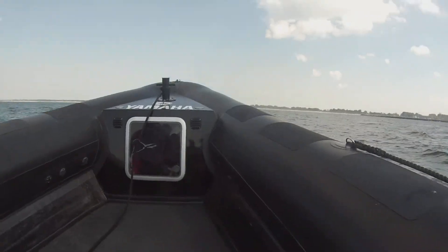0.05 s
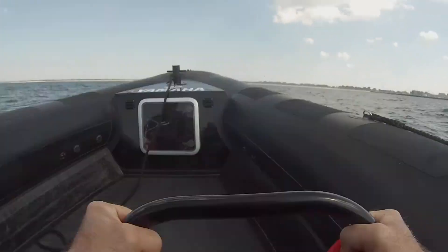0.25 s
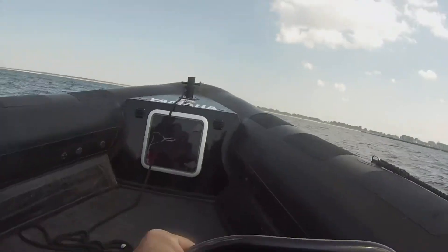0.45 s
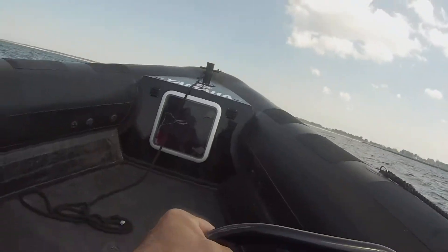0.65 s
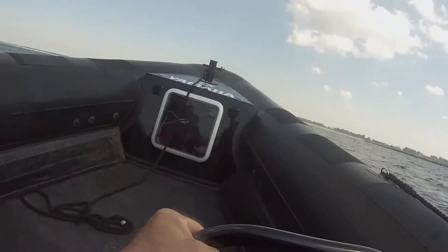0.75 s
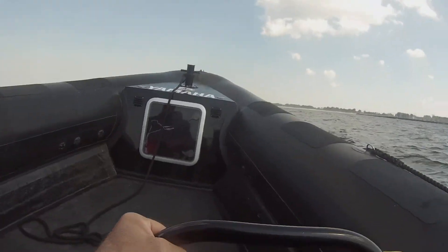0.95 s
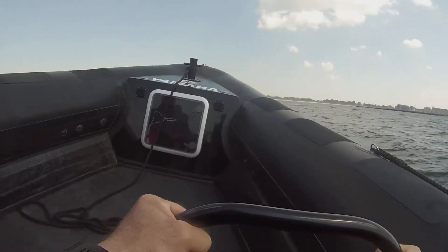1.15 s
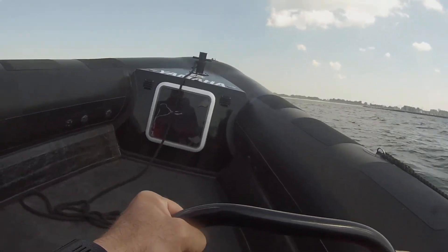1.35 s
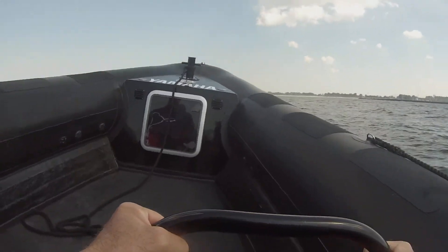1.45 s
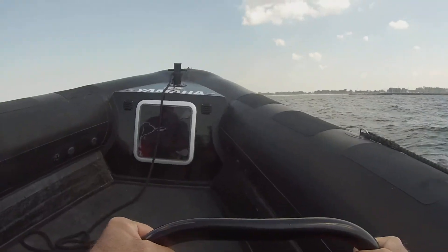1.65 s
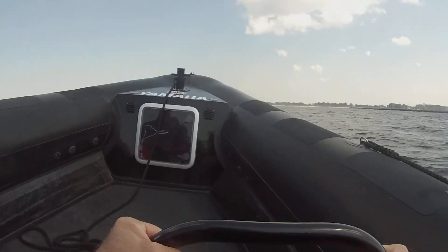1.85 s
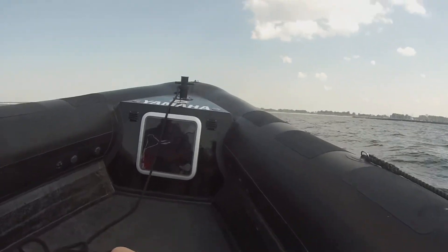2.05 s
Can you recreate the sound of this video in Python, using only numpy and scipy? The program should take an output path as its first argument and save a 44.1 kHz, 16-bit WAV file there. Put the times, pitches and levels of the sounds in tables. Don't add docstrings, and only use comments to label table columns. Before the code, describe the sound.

A loose buckle clacks sharply against a plastic camera housing, over faint muffled engine hum and spray

```python
import sys
import numpy as np
from scipy import signal
from scipy.fft import rfft, irfft
from scipy.io import wavfile
from scipy.ndimage import uniform_filter1d

SR = 44100
rng = np.random.default_rng(int(sys.argv[2]) if len(sys.argv) > 2 else 0)


def undo_db(level):
    steps = np.asarray(level, float) / 20
    return 10 ** steps


def master(y):
    cut = np.clip(np.atleast_2d(y).T, -1, 1)
    pcm = np.round(cut * 32767)
    wavfile.write(sys.argv[1], SR, pcm.astype(np.int16))


N = 90405


def knocks():
    # start_s, strength_db, thud_db, bright_share (0-1), metal_ring_db
    hits = [(0.0741, -31.5, -7, 0.63, -58), (.2375, -22, -8, 1, -71), (.251, -21.5, -10, 0.7, -61),
            (.2565, -22, -9, 0.6, -52.5), (.4100, 8, -6, 0.54, -46), (0.4148, 9.5, -6, 0.54, -59.5),
            (0.42, -4, -7.5, 0.7, -87.5), (.4330, -2, -2.5, 0.45, -47), (0.545, -39, -14, 0.76, -34),
            (0.7597, -30.5, -8, 0.7, -49), (0.78, -8, 7.5, 0.55, -42), (0.7838, -5, -8.5, 0.1, -59),
            (1.1444, 7, -2.5, 0.5, -41), (1.272, -7.5, 3.5, 0.49, -43.5), (1.3474, 4, -3.5, 0.46, -46.5),
            (1.3539, -5.5, 3.5, 0.54, -58.5), (1.356, -8, -1.5, 0.25, -51), (1.5664, 5, -3.5, 0.49, -41.5),
            (1.5730, -0.5, 0.5, 0.24, -59), (1.600, -43, -11, 0.87, -59.5), (1.615, -47, -10, 1, -58.5),
            (1.639, -43.5, 21, 0.45, -44), (1.6691, -42, 17, 0.28, -41), (1.7799, -10.5, 5, 0.42, -43.5),
            (1.8289, -10, 3, 0.41, -39), (1.8765, -20.5, 8.5, 0.37, -48), (2.0324, -18, 12, 0.4, -43),
            (2.041, -26, 17.5, 0.38, -28), (.4112, -2, -10, 0.4, -57), (1.1457, -2.5, -8.5, 0.57, -53),
            (1.2735, -29, 4.5, 0, -59.5), (1.3485, -9.5, -4.5, .6, -63.5), (1.5677, -2.5, 3.5, 0.4, -58),
            (1.7812, -27, 6, 0.66, -53), (1.8305, -22, -2, 0.05, -52), (1.912, -39.5, 12, 0.26, -61.5)]
    # pitch_hz, level_db, t60_s
    thud_modes = [(218, -20.5, 0.02), (354, -18.5, 0.012), (539.5, -15.5, 0.01), (110, -32.5, 0.027)]
    fitting_hz = [1647, 2490, 3030, 3273, 3677, 4533, 4810, 5340, 6620, 7262]
    # level_db, t60_s
    fitting_decay = [(1.5, 0.15), (-6, 0.12), (-30, .15), (-28, .3), (-3, .09), (-11, 0.32), (-27.5, .2),
                     (-24, 0.15), (-33, 0.2), (-25, 0.36)]
    contact_ms = 0.79
    low, high, metal, mount = np.zeros((4, N))
    ms = np.arange(200) / SR * 1000
    first = ms == 0
    draws = rng.standard_normal((len(hits), 400))
    for (start, strength_db, thud_db, bright, ring_db), draw in zip(hits, draws):
        touching = abs(draw[200:]) > 1.6
        chatter = 0.15 * draw[:200] * touching * np.exp(-ms / contact_ms)
        blow = undo_db(strength_db) * (first + chatter)
        add(low, start, blow * (1 - bright))
        add(high, start, blow * bright)
        add(mount, start, -undo_db(strength_db + thud_db + 5) * first)
        add(metal, start, undo_db(strength_db + ring_db) * first)
    fitting = [(hz, db, t60) for hz, (db, t60) in zip(fitting_hz, fitting_decay)]
    thud = signal.lfilter(*signal.butter(2, 70, "high", fs=SR), ring(mount, thud_modes))
    return case(low, high) + ring(metal, fitting) + thud


def scrapes():
    # start_s, length_s, level_db, bright_share (0-1)
    strokes = [(.0, 0.015, -31.5, 0.6), (0.085, 0.0076, -39, 0.7), (0.188, 0.0063, -33, 0.8),
               (0.22, 0.007, -37, 0.2), (.232, 0.017, -12.5, 0.58), (0.251, 0.013, -23.5, 0.76),
               (.267, 0.0225, -22.5, 0.37), (0.2931, 0.0012, -12.5, 0.25), (.299, 0.0046, -11, 0.61),
               (0.308, 0.0031, -6, 0.52), (0.313, 0.011, -20, 0.82), (0.3389, 0.0027, -15, 0.3),
               (0.342, .007, -18.5, .6), (0.36, 0.0032, -10.5, 0.4), (0.365, .003, -19, .4),
               (.368, 0.005, -6, .3), (0.373, .004, -1, .35), (0.379, .003, -14.5, .2),
               (0.382, 0.0075, -11, 0.3), (0.391, 0.0026, -10.5, .7), (0.3994, 0.003, -7, 0.5),
               (0.4055, .002, -17.5, 0.8), (0.447, 0.075, -37.5, 0.52), (.66, 0.027, -41.5, 0.42),
               (1.58, 0.035, -47, .8), (1.893, 0.019, -41, 0.43)]
    low, high = np.zeros((2, N))
    slips = rng.standard_normal((2, N)) * (rng.random(N) < 0.5)
    slips = slips * undo_db(1.5 * wobble(1.66) - 10)
    for start, length, level_db, bright in strokes:
        t = np.arange(0, length + 0.047, 1 / SR)
        attack = np.minimum(t / 0.00033, 1)
        release = undo_db(-6000 * np.maximum(t - length, 0))
        stroke = undo_db(level_db - 8) * attack * release
        add(low, start, stroke * (1 - bright))
        add(high, start, stroke * bright)
    return case(low * slips[0], high * slips[1])


def pushes():
    # centre_s, level_db, pitch_hz, half_length_cycles, direction (+1 or -1)
    jolts = [(0.065, -22.5, 139.4, 1.7, -1), (0.134, -24, 90, 3.9, -1), (0.227, -13, 98, 0.84, -1),
             (0.236, -8.5, 71, 0.48, 1), (.249, -8, 140, 0.45, -1), (.256, -14, 53, 6.8, 1),
             (0.267, -12, 130, 2.16, 1), (0.287, -26, 110, 0.94, -1), (0.3063, -3, 130, 1, -1),
             (.310, -5.5, 130, 0.34, 1), (.316, -5.5, 61, 0.6, 1), (0.329, -15, 70, 1.1, -1),
             (0.47, -34, 64.4, 0.95, 1), (0.526, -35.5, 377, 7.5, 1), (.535, -47, 152, 1.4, 1),
             (0.649, -42.5, 63.7, 3, 1), (0.731, -51.5, 81.6, 3, 1), (0.98, -39, 68.4, 2.5, 1),
             (1.209, -40, 55.9, 4.3, 1), (1.326, -29.5, 152, 2.4, 1), (1.358, -35, 81, 3.9, 1),
             (1.46, -28.5, 71.5, 0.3, 1), (1.454, -36, 418, 1.74, 1), (1.798, -42, 60.4, 3.1, -1),
             (1.915, -38, 525, 1.4, 1)]
    out = np.zeros(N)
    for centre, level_db, hz, cycles, direction in jolts:
        half = cycles / hz
        t = np.arange(-half, half, 1 / SR)
        bell = np.exp(-(2.17 * t / half) ** 2)
        swing = np.cos(2 * np.pi * hz * t)
        add(out, centre - half, np.sign(direction) * undo_db(level_db) * bell * swing)
    return out


def engine():
    # time_s, pitch_hz, level_db
    running = [(0, 213, -42.5), (.2, 216, -39), (.45, 219, -58), (.8, 221.7, -60), (1.14, 217, -52.5),
               (1.3, 216, -59), (1.75, 218.5, -62.5), (2.05, 219.5, -54)]
    # multiple_of_pitch, level_db
    orders = [(0.331, -11.5), (0.666, -3), (1, 2.5), (1.332, -12.5), (1.999, -28)]
    turns = np.cumsum(curve(running) * (1 + 0.0087 * wobble(26))) / SR
    hum = np.zeros(N)
    for multiple, level_db in orders:
        level = undo_db(level_db + 2.2 * wobble(30))
        hum += level * np.sin(2 * np.pi * (multiple * turns + rng.random()))
    return np.sqrt(2) * undo_db(curve(running, count=2)) * hum


def water():
    # time_s, level_db
    spray = [(0, -41.5), (.15, -45.5), (.24, -26.5), (.33, -37), (.45, -53.5), (.53, -50.5), (.6, -54.5),
             (.68, -57.5), (.76, -48.5), (.88, -59), (1.02, -55.5), (1.15, -55), (1.25, -56.5),
             (1.42, -60.5), (1.6, -54.5), (1.74, -62.5), (1.9, -56.5), (2.05, -61.5)]
    # pitch_hz, level_db (per Hz)
    hiss = [(1530, -2), (4070, -7.5), (4960, 0), (5390, -8), (6230, -7), (9500, -18), (11000, -21),
            (16000, -33)]
    drop_sizes = undo_db(1.7 * np.minimum(rng.exponential(1, N), 5))
    drops = rng.standard_normal(N) * drop_sizes * (rng.random(N) < 0.25)
    body = evened(sealed(case(drops, 0.5 * drops)))
    wash = shaped([(250, 13), (500, 6), (800, 2.5), (1200, -2.5)])
    flicker = undo_db(curve(spray) + 0.82 * wobble(6))
    fizz = undo_db(-18 + 2.2 * wobble(4)) * shaped(hiss)
    fizz += undo_db(-18.5) * shaped([(2600, -5), (3000, -2.5), (3800, -0.5), (4200, -14)])
    wash_level = undo_db(-1 + 3.6 * wobble(6.5))
    return flicker * (body + fizz + wash_level * wash)


def wind():
    # time_s, level_db
    gusts = [(0, -32), (.18, -34), (.24, -17.5), (.32, -20), (.36, -32.5), (.44, -42.5), (.7, -52.5),
             (1.05, -49), (1.2, -43), (1.38, -42), (1.5, -48), (1.75, -49.5), (2.05, -48)]
    # pitch_hz, level_db (per Hz)
    rumble = [(8.8, -31), (15, 9), (80, 0.5), (117, -5.5), (221, -11), (314, -21), (1000, -35.5),
              (1300, -56.5), (2200, -120)]
    lumps_db = wobble(5.7) + 3.9 * wobble(3.1)
    return undo_db(curve(gusts) + lumps_db) * shaped(rumble)


def case(low, high):
    # pitch_hz, level_db, t60_s
    low_modes = [(759, -9, 0.027), (973, -9.5, 0.021), (1192, -9.5, 0.0057), (1350.2, 3, 0.018),
                 (1551.5, 5.5, 0.011)]
    # pitch_hz, level_db, t60_s
    high_modes = [(2041, 6, 0.01), (2255, 6, 0.013), (2877, -0.5, 0.0055), (4780, -11, 0.0091),
                  (6270, -7.5, 0.0045), (8500, -6.5, 0.0025), (11000, -6, .003)]
    ringing = ring(low, low_modes) + ring(high, high_modes)
    return signal.lfilter(*signal.butter(2, 866, "high", fs=SR), ringing)


def ring(strike, modes):
    swell_ms = 0.6
    t = np.arange(SR // 2) / SR
    tones = sum(undo_db(db - 60 * t / t60) * np.sin(2 * np.pi * hz * t) for hz, db, t60 in modes)
    swell = 1 - np.exp(-1000 * t / swell_ms)
    return signal.fftconvolve(strike, tones * swell)[:N]


def sealed(x, hz=3500):
    return signal.lfilter(*signal.butter(2, hz, fs=SR), x)


def evened(x):
    return x / np.sqrt(np.mean(x ** 2) + 1e-20)


def curve(table, count=1):
    rows = np.array(table)
    return np.interp(np.arange(N) / SR, rows[:, 0], rows[:, count])


def add(mix, start_s, sound):
    part = mix[max(round(start_s * SR), 0):][:len(sound)]
    part += sound[:len(part)]


def wobble(ms):
    size = max(int(ms * SR / 1000), 1)
    smooth = uniform_filter1d(rng.standard_normal(N), size)
    return evened(uniform_filter1d(smooth, size))


def shaped(points):
    point_hz, point_db = np.transpose(points)
    hz = np.fft.rfftfreq(N, 1 / SR)
    level_db = np.interp(np.log(hz + 1), np.log(point_hz + 1), point_db, -99, -99)
    return evened(irfft(rfft(rng.standard_normal(N)) * undo_db(level_db), N))


def ducked(x):
    threshold_db, duck_share, lag_ms, recover_db_per_s = -4, 0.75, 2.4, 500
    fall = np.arange(N) * recover_db_per_s / SR
    level_db = 20 * np.log10(abs(x) + 1e-9)
    held_db = np.maximum.accumulate(level_db + fall, axis=1) - fall
    over_db = np.maximum(held_db - threshold_db, 0)
    late_db = np.pad(over_db, ((0, 0), (round(lag_ms * SR / 1000), 0)))[:, :N]
    return x / undo_db(duck_share * uniform_filter1d(late_db, size=30, axis=1))


def scene():
    contacts = sealed(knocks() + sealed(scrapes(), hz=5000))
    return (contacts + pushes() + water() + wind() + engine())[None]


def roll_off(x):
    return signal.sosfilt(signal.butter(12, 16470, fs=SR, output="sos"), x)


def record(dry):
    held = ducked(dry)
    squeezed = 0.97 * held / (1 + abs(held) ** 10) ** (1 / 10)
    heard = signal.lfilter(*signal.butter(4, 12500, fs=SR), squeezed)
    return roll_off(heard)


dry = scene()
out = record(dry)
master(out)
```